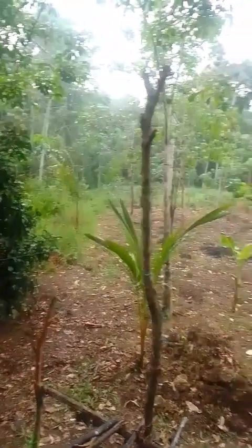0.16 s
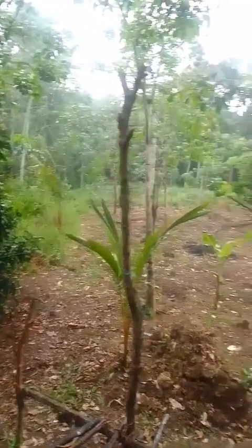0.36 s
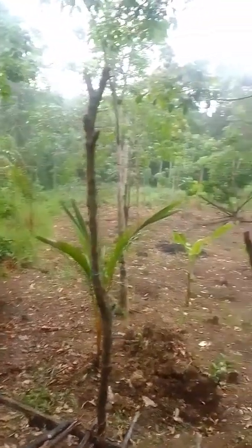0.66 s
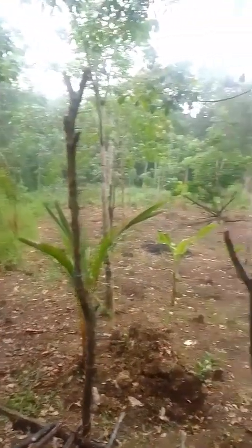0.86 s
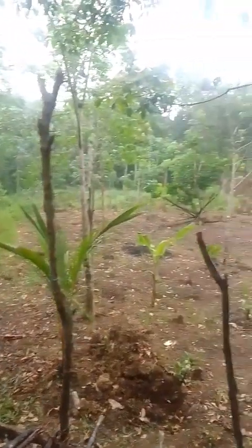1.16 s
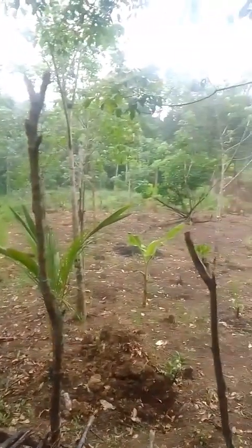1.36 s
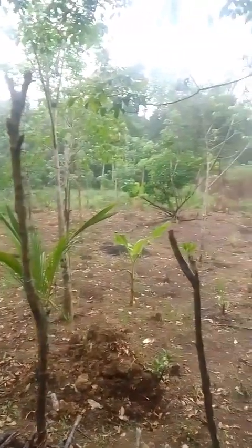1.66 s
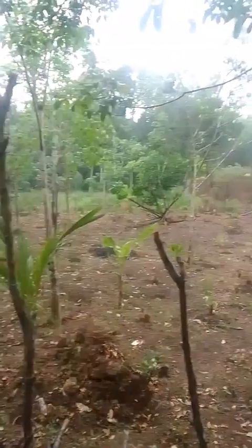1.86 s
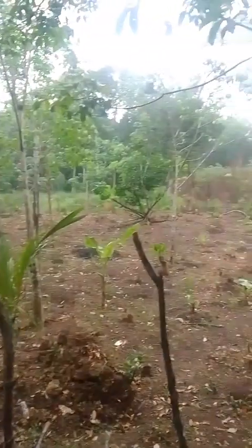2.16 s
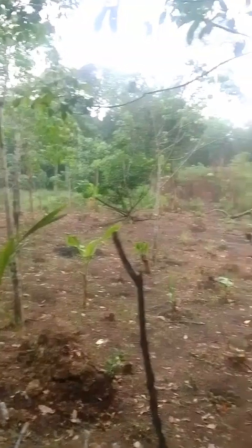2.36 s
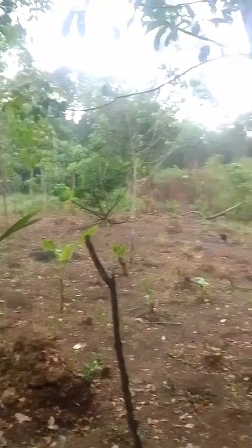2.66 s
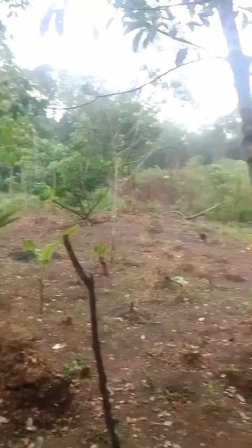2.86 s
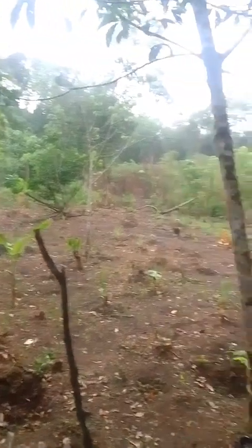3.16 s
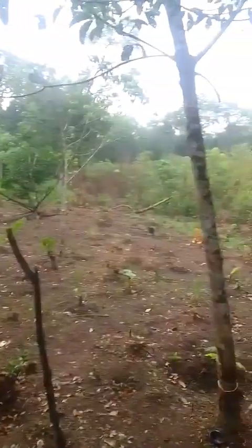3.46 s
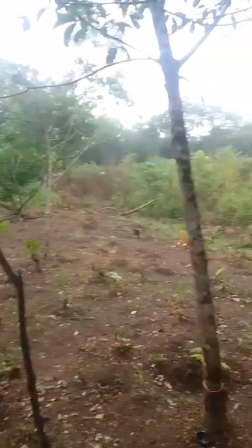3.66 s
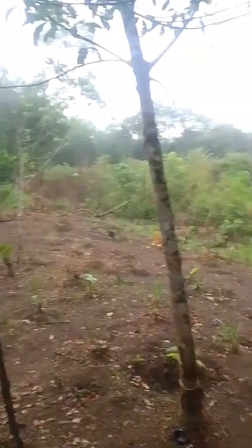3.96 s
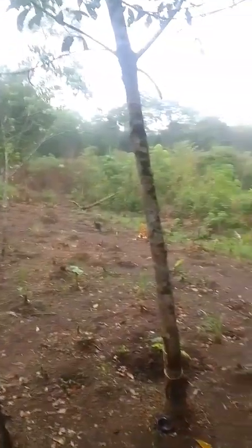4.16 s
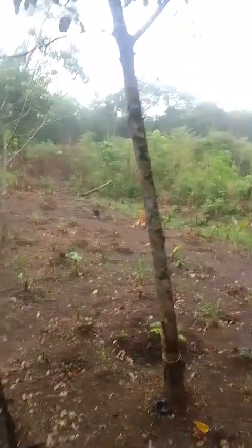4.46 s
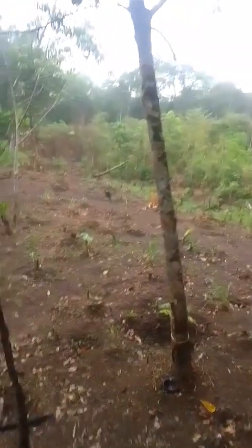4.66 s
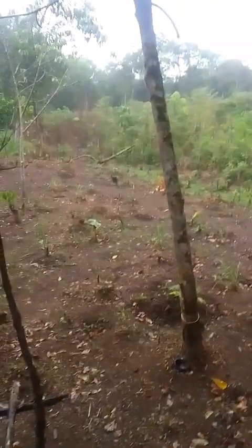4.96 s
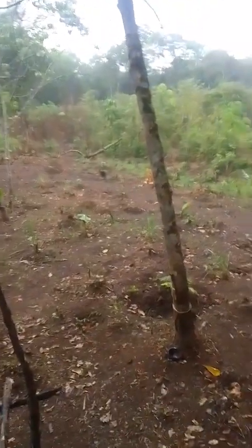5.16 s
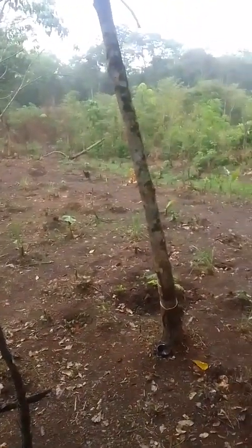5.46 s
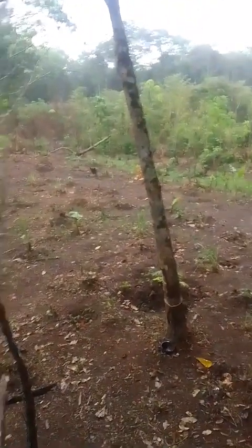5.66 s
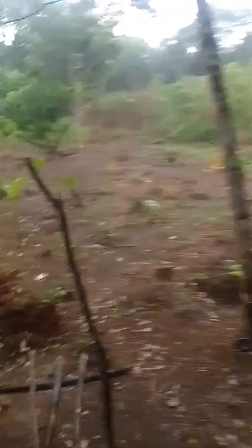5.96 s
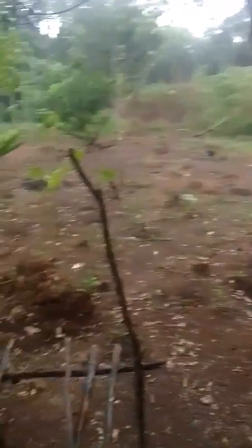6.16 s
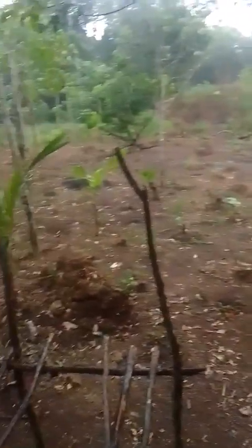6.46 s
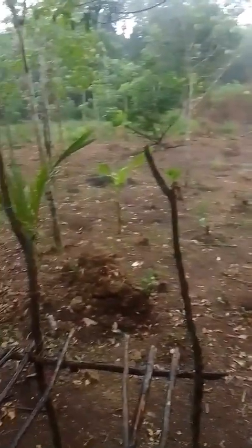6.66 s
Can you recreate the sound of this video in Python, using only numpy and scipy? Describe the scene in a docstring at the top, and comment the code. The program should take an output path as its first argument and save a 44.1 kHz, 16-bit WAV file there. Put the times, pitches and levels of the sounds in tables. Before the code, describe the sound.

Steady rain falls on an open garden plot with trees, captured in mono by a hand-held camera. A continuous, mid-heavy wash of far drops starts fairly strong, sinks by 0.4 s, and swells again around 1.2 s, with faint leaf ticks throughout. From 0.3 to 1 s, near drops are crisp and bright. At 1.04 s one lands on the camera: a loud dull bump with a short knock and fading low rumble. Scattered slaps continue, clustering at 2.5-2.8 s and 3.0-3.3 s, with occasional tiny leaf pings and hollow soil plops. The rain eases around 3.4-3.8 s, then surges near 3.9 s. Heavy, duller drops hit at 4.0, 4.4 and 4.7 s, and a dense run of slaps and plops fills 5.0-5.5 s. More strike near 5.95 s; then close hits thin out, and the wash rises to its fullest by 6.8 s.

```python
"""Steady rain on a garden plot with trees, heard from a hand-held camera. Far drops merge into a wash of shaped
noise whose level rises and falls, with light leaf ticks a few steps away. Close by, big drops slap leaves and
wet soil: short noise bursts, swinging tones and brief leaf rings. Heavy drops plop hollowly into soaked soil,
and stiff leaves ping, as tones that sink in pitch. One drop lands on the camera itself with a dull bump: a
pressure pulse, a knock and a low rumble."""
import sys
import numpy as np
from scipy import signal
from scipy.io import wavfile
from scipy.ndimage import uniform_filter1d

SR = 44100
rng = np.random.default_rng(int(sys.argv[2]) if len(sys.argv) > 2 else 0)


def to_wav(sig):
    """Store sig (one row per channel, or 1-D mono) as 16-bit WAV at the path in sys.argv[1].

    Samples outside -1..1 are clipped; the rate is SR.
    """
    pcm = np.clip(np.atleast_2d(sig), -1, 1) * 32767
    pcm = np.round(pcm).astype(np.int16)
    wavfile.write(sys.argv[1], SR, pcm.T)  # frames by channels


N = 299439


def gain_of(db):
    """Decibels to amplitude."""
    return 10 ** (np.asarray(db) / 20)


def evened(x):
    """Scales to rms 1."""
    return x / np.sqrt(np.mean(x ** 2) + 1e-20)


def at_level(sound, level_db):
    """Scales a short sound to a level taken over 10 ms."""
    return gain_of(level_db) * sound / np.sqrt(np.sum(sound ** 2) / (SR / 100))


def add(mix, start_s, sound):
    """Adds a sound into the mix at its start time, cut off at the end of the mix."""
    part = mix[max(round(start_s * SR), 0):][:len(sound)]
    part += sound[:len(part)]


def band_gain(points, hz, low_hz, high_hz):
    """One band of a colour table; neighbouring bands add up in power."""
    table_hz, table_db = np.transpose(points)
    hz = hz + 1  # keeps the logarithm finite at 0 Hz
    share = 1 / (1 + (low_hz / hz) ** 10) / (1 + (hz / high_hz) ** 10)
    return gain_of(np.interp(np.log(hz), np.log(table_hz), table_db)) * np.sqrt(share)


def sharp_front(gain):
    """Gives a gain over the full frequency circle the phase that keeps its sound from starting early."""
    log_gain = np.log(np.maximum(gain, 1e-4))
    return np.exp(np.conj(signal.hilbert(log_gain)))


def causal(points, low_hz, high_hz, size=2048):
    """Impulse response with the colour of one band and a sharp front."""
    gain = band_gain(points, abs(np.fft.fftfreq(size, 1 / SR)), low_hz, high_hz)
    return np.fft.ifft(sharp_front(gain)).real[:size // 2]


def whitened(x, size=45):
    """Evens out the broad humps in the spectrum of a short noise; energy 1."""
    spectrum = np.fft.fft(evened(x))
    power = uniform_filter1d(abs(spectrum) ** 2, size, mode="wrap") / len(x)
    flat = np.fft.ifft(spectrum / sharp_front(np.sqrt(abs(power)))).real
    return evened(flat) / np.sqrt(len(x))


def ringing(x, hz, width_hz, boost_db):
    """Lifts one damped resonance out of a sound."""
    peak = signal.iirpeak(hz, hz / width_hz, fs=SR)
    return x + gain_of(boost_db) * signal.lfilter(*peak, x)


def wander(size):
    """Smooth random drift of rms 1 that changes over size samples."""
    smooth = uniform_filter1d(rng.standard_normal(N), size)
    return evened(uniform_filter1d(smooth, size // 2))


def patter(per_s, spread_db, decay_s, ring_db, count=20):
    """Small drops at random moments, most faint and a few strong; each kind of leaf rings at its own pitch."""
    strength = gain_of(spread_db * np.minimum(rng.exponential(1, N), 4))
    hits = strength * (rng.random(N) < per_s / SR)
    kind = rng.integers(0, count, N)
    t = np.arange(SR // 50) / SR
    spatters = rng.standard_normal((count, len(t))) * np.exp(-t / decay_s)
    out = np.zeros(N)
    for k, hz in enumerate(np.geomspace(250, 7000, count)):
        spatter = ringing(evened(spatters[k]), hz, width_hz=150 + 0.042 * hz, boost_db=ring_db)
        out += signal.oaconvolve(hits * (kind == k), spatter)[:N]
    return evened(out)


# bass under the rain: time_s, level_db
BASS_LEVEL = [(0, -78), (.28, -80), (.39, -54), (.55, -67), (.7, -62.5), (1.0, -62), (1.19, -55),
              (1.5, -53), (1.7, -60.5), (2.3, -55), (2.62, -56), (2.76, -60), (2.9, -62), (3.22, -60),
              (3.4, -62), (3.58, -64), (3.72, -84), (3.83, -69), (3.97, -77), (4.05, -53.5), (4.55, -59),
              (4.72, -53), (5.1, -46.5), (5.55, -63), (5.8, -57), (5.9, -49), (6.15, -53.5), (6.5, -47),
              (6.79, -42.5)]
# low patter: time_s, level_db
LOW_PATTER_LEVEL = [(0, -51), (.2, -59.5), (.4, -54), (.55, -60), (.7, -53), (.9, -55.5), (1.15, -50),
                    (1.5, -55.5), (1.8, -59), (2.1, -60.5), (2.35, -52.5), (2.9, -55), (3.3, -54.5),
                    (3.75, -63.5), (3.95, -54), (4.2, -51.5), (4.5, -57), (4.8, -48), (5.3, -45),
                    (5.6, -51), (5.95, -47.5), (6.15, -50), (6.5, -44), (6.75, -40)]
# levels of the wash rise and fall: time_s, leaf_roar_db, soil_patter_db, spray_hiss_db
RAIN_LEVELS = [(0.0, -32.5, -45.5, -49.5), (0.18, -35.5, -43.5, -50), (0.28, -38.5, -45.5, -53),
               (0.43, -43, -50.5, -54), (0.58, -40.5, -51.5, -54.5), (0.74, -40, -47.5, -54),
               (0.84, -41.5, -52, -53.5), (1.02, -42.5, -51, -53.5), (1.14, -36, -42.5, -47),
               (1.26, -35, -46, -49), (1.38, -37, -49, -51), (1.54, -36, -46, -50),
               (1.63, -40, -51.5, -55.5), (1.87, -40.5, -51, -55), (2.2, -41.5, -49, -52),
               (2.28, -37.5, -50.5, -50.5), (2.59, -41, -49.5, -51), (2.97, -40.5, -48.5, -53.5),
               (3.18, -41, -51, -54.5), (3.46, -40.5, -47.5, -56), (3.66, -41, -53, -58.5),
               (3.8, -42, -51, -60), (3.88, -35.5, -42.5, -53), (3.98, -34.5, -44.5, -51.5),
               (4.1, -36.5, -47, -50), (4.22, -34.5, -45, -52), (4.35, -36, -43.5, -54.5),
               (4.47, -39, -50, -53), (4.64, -38.5, -48.5, -56), (4.76, -36, -45, -53),
               (4.9, -40, -49, -53), (5.0, -33.5, -41, -47), (5.12, -34, -42, -53.5),
               (5.26, -36.5, -44, -53), (5.35, -39, -48, -55.5), (5.54, -42, -50, -57.5),
               (5.63, -36.5, -52, -55.5), (5.77, -40.5, -55, -55.5), (5.9, -38, -41.5, -53),
               (5.99, -37.5, -41, -56), (6.1, -41.5, -47, -54.5), (6.3, -38, -46.5, -57),
               (6.48, -41, -49.5, -55), (6.56, -36, -44, -48.5), (6.7, -32.5, -39.5, -43.5),
               (6.79, -29, -44, -44)]


def wash_levels():
    """Levels in dB over time of the bass, the low patter, the soil patter, the leaf roar and the spray hiss."""
    t = np.arange(N) / SR
    time_s, roar_db, soil_db, hiss_db = np.transpose(RAIN_LEVELS)
    lows = [np.interp(t, *np.transpose(curve)) for curve in (BASS_LEVEL, LOW_PATTER_LEVEL)]
    return lows + [np.interp(t, time_s, level_db) for level_db in (soil_db, roar_db, hiss_db)]


# colour of the far wash; each band is levelled apart: frequency_hz, density_db (relative dB per Hz)
WASH_COLOUR = [(30, -16), (80, -10), (170, -4), (330, -3.5), (620, -5), (900, -4), (1070, -4), (1190, 0),
               (1290, 3), (1390, 1.5), (1560, -2), (1700, -3.5), (2000, -6), (3400, -15), (4600, -25.5),
               (6800, -31.5), (8900, -29), (10000, -39.5), (12000, -42), (15300, -51.5)]
# borders of the five bands, from bass to spray hiss: edge_hz
WASH_BAND_EDGES = [10, 160, 330, 1000, 4100, 20000]


def wash():
    """Countless far drops merge into noise; nearer ones stand out as grain in every band at once."""
    grain_db = [-6, -10.5, -8, -9.5, -10.5]  # grain against the noise, band by band
    patch_db = [1.6, 1.2, 0.7, 0.21, 0.42]  # rms drift of each band's own level
    grain = patter(per_s=1000, spread_db=3.0, decay_s=0.00058, ring_db=13.0)
    flutter_db = 0.77 * wander(size=1300)  # shared by all bands
    out = np.zeros(N)
    for k, level_db in enumerate(wash_levels()):
        drive = rng.standard_normal(N) + gain_of(grain_db[k]) * grain
        colour = causal(WASH_COLOUR, *WASH_BAND_EDGES[k:k + 2])
        band = evened(signal.oaconvolve(drive, colour)[:N])
        out += band * gain_of(level_db + flutter_db + patch_db[k] * wander(size=1800))
    return out


# colour of a drop's splash, for the ticks and the near drops: frequency_hz, density_db (relative dB per Hz)
SPLASH_COLOUR = [(30, -15), (120, -2.5), (300, 2), (480, 3), (660, -0.5), (900, 0), (1350, -1.5),
                 (2300, -6), (3700, -7), (4600, -11.5), (8800, -16), (10200, -26.5), (12000, -26.5),
                 (15000, -34.5)]


def ticks(level_db):
    """Light ticks on fallen leaves a few steps away: sparse patter in the splash colour."""
    crackle = patter(per_s=70, spread_db=3.5, decay_s=0.0004, ring_db=12)
    colour = causal(SPLASH_COLOUR, low_hz=1500, high_hz=9500)
    return gain_of(level_db) * evened(signal.oaconvolve(crackle, colour)[:N])


def boom(start_s, level_db, hz, width_hz, swell_s):
    """A low rumble, narrow-band noise, swells after the bump and fades."""
    age = np.maximum(np.arange(N) / SR - start_s, 0) / swell_s
    peak = signal.iirpeak(hz, hz / width_hz, fs=SR)
    once = signal.lfilter(*peak, rng.standard_normal(N))
    rumble = evened(signal.lfilter(*peak, once))
    return gain_of(level_db) * rumble * (age * np.exp(1 - age)) ** 2


def bump(hit_s, level_db, push_s, swing_s, knock_hz, knock_db, knock_s, lead_s, settle_s, settle_share):
    """A drop on the camera body: a swing, a brief opposite pressure push, a case knock and a slow settling."""
    t = np.arange(-SR // 40, SR // 2) / SR
    push = np.exp(-np.hypot(t, push_s / 2) / push_s)
    swing = np.exp(-((t + lead_s) / swing_s) ** 2)
    settle = (t > 0) * np.exp(-abs(t) / settle_s)
    # swing and settling together balance the push, so the pressure sums to zero
    balance = (1 - settle_share) * swing / swing.sum() + settle_share * settle / settle.sum()
    pulse = push.sum() * balance - push
    since_knock = t + lead_s
    knock = (since_knock > 0) * np.sin(2 * np.pi * knock_hz * since_knock) * np.exp(-abs(since_knock) / knock_s)
    out = np.zeros(N)
    add(out, hit_s + t[0], gain_of(level_db) * pulse / abs(pulse).max() + gain_of(knock_db) * knock)
    return out


def plop(hz, level_db, decay_s, sag_per_s, rise_s):
    """A struck leaf or puddle swings for a few cycles and sinks in pitch."""
    t = np.arange(SR // 16) / SR
    turns = np.cumsum(hz * np.exp(-sag_per_s * t)) / SR
    shape = (1 - np.exp(-t / rise_s)) * np.exp(-t / decay_s)
    return at_level(np.sin(2 * np.pi * turns) * shape, level_db)


# hollow plops where heavy drops break into soaked soil:
# start_s, level_db (over 10 ms), pitch_hz (at the start), sag_per_s (pitch fall), decay_s
SOIL_PLOPS = [(1.976, -40, 201, 5, 0.0028), (2.7735, -36.5, 168, 6, .005), (3.025, -36.5, 330, 8, 0.0033),
              (3.2555, -27.5, 340, 13, 0.0033), (3.2562, -45, 667, 10, 0.0018),
              (4.0152, -25.5, 740, 4.4, 0.0063), (4.0155, -24, 338, 12, 0.0025),
              (4.035, -33, 290, 12, 0.0057), (4.382, -38, 195, 5, 0.0069), (4.3855, -29.5, 813, 51, 0.003),
              (4.7159, -27, 205, 5, 0.0045), (4.7258, -29, 488, 8, 0.0099), (4.728, -34, 324, 7.2, .006),
              (5.0508, -29, 184, 8.8, 0.0086), (5.0525, -28, 620, 16, .003),
              (5.0627, -25.5, 302, 16, 0.0018), (5.1607, -30, 523, 10, 0.0015),
              (5.235, -37, 240, 10, 0.0025), (5.268, -34, 330, 15, 0.0029), (5.387, -36.5, 417, 20, 0.0057)]
# stiff leaves ping under some of the hardest drops: start_s, level_db (over 10 ms), pitch_hz (at the start), decay_s
LEAF_PINGS = [(0.8971, -32, 4030, 0.0016), (0.9567, -46, 8700, .0015), (1.2342, -39.5, 4020, .0015),
              (1.976, -28, 3820, 0.0014), (2.1456, -42, 4300, 0.0017), (3.2562, -31, 3520, .002),
              (5.4614, -32, 3470, .001)]


def plops():
    """The hollows that heavy drops punch into the mud sound with a falling note; stiff leaves ping."""
    out = np.zeros(N)
    for start_s, level_db, hz, sag_per_s, decay_s in SOIL_PLOPS:
        add(out, start_s, plop(hz, level_db, decay_s, sag_per_s, rise_s=0.0021))
    for start_s, level_db, hz, decay_s in LEAF_PINGS:
        add(out, start_s, plop(hz, level_db, decay_s, sag_per_s=5, rise_s=0.00025))
    return out


def burst(noise, colour, level_db, decay_s, rise_s, scatter_db, scatter_s, click_db=-np.inf):
    """Water bursts on a surface: perhaps a click, a fast-dying gush, then a faint scatter of droplets."""
    t = np.arange(len(noise)) / SR
    fading = np.exp(-t / decay_s) + gain_of(scatter_db) * np.exp(-t / scatter_s)
    gush = whitened(noise * (1 - np.exp(-t / rise_s)) * fading)
    click = gain_of(click_db) * (t == 0)
    return at_level(signal.fftconvolve(gush + click, colour), level_db)


# lesser near drops: mean and spread of the level (against the leaf roar) and of the brightness
LESSER_PER_S = 14
LESSER_DB, LESSER_BRIGHT_DB = (-8, -0.5), (0.5, -2)
LESSER_DECAY_S, LESSER_THUD_HZ = 0.0023, 795
LESSER_LEAF_HZ = (1260, 4200)  # lowest and highest leaf ring


def lesser_drops(count=120):
    """Rows like those of the near drops, for weaker ones at random moments and leaves; their level follows the
    leaf roar."""
    gap, leaf = rng.random((count, 2)).T
    size, bright = rng.standard_normal((count, 2)).T
    start_s = np.cumsum(-np.log(1 - gap)) / LESSER_PER_S
    roar_db = np.interp(start_s, *np.transpose(RAIN_LEVELS)[:2])
    low_hz, high_hz = LESSER_LEAF_HZ
    rows = np.transpose([start_s,
                         roar_db + LESSER_DB[0] + LESSER_DB[1] * size,
                         LESSER_BRIGHT_DB[0] + LESSER_BRIGHT_DB[1] * bright,
                         np.full(count, LESSER_DECAY_S),
                         low_hz * (high_hz / low_hz) ** leaf,
                         np.full(count, LESSER_THUD_HZ)])
    return list(rows[start_s < N / SR])


# thud and spray against the slap, at brightness 0
THUD_DB, SPRAY_DB = -5.5, -10
# swing of the struck leaf and after-rumble against the thud
SWING_DB, RUMBLE_DB = -7.5, -17
# the thud outlasts the slap, the more so the duller the drop
THUD_LINGER_S, THUD_LINGER_PER_DB = 0.00053, 0.1
# borders of the thud, slap and spray bands: edge_hz
DROP_BAND_EDGES = [10, 900, 3000, 20000]
# near drops: start_s, level_db (slap, over 10 ms), brightness_db (above 0 more spray, below 0 more thud),
# decay_s (base that each part scales), leaf_ring_hz, thud_pitch_hz
NEAR_DROPS = [(0.0639, -35.5, 3, 0.00092, 3720, 800), (0.1805, -41.5, 20, 0.0031, 3680, 480),
              (0.3043, -35, 7.5, 0.0023, 1400, 700), (0.331, -39, 12.5, 0.0057, 4130, 840),
              (0.3407, -35, 5.5, 0.0017, 1360, 840), (0.3517, -37, 4, 0.0018, 8400, 700),
              (0.3605, -48, 9, .001, 8400, 700), (0.385, -48, 12, 0.0019, 6100, 800),
              (0.4233, -32.5, 9, 0.0013, 4960, 815), (0.4401, -35, 6, 0.0024, 2720, 360),
              (0.4571, -38, 3, .001, 3700, 600), (0.4683, -38.5, 1, 0.0011, 3500, 700),
              (0.512, -37, 10.5, 0.0018, 1900, 840), (0.5255, -51, 11, .001, 7000, 800),
              (0.6165, -41, 2, 0.001, 2500, 800), (0.645, -42, 1, 0.00065, 2700, 800),
              (0.6609, -31, 7, 0.0006, 2530, 860), (0.668, -43, 2, .002, 3000, 800),
              (0.711, -44, 6, .001, 7000, 800), (0.7224, -39, 7, 0.00048, 2820, 800),
              (0.74, -45, 8, .001, 2700, 800), (0.7768, -46.5, 13, 0.0025, 8200, 800),
              (0.782, -45.5, 13, 0.0057, 4360, 840), (0.8972, -33, 11, 0.0036, 4100, 446),
              (0.9359, -41, -5, 0.0011, 2300, 800), (0.9519, -32.5, 5.5, 0.0015, 3040, 840),
              (0.9568, -34, 7, 0.0044, 8700, 676), (0.9661, -34, -4, 0.003, 1330, 584),
              (1.0072, -39.5, 12, 0.0047, 9400, 680), (1.0274, -49, 12, .001, 2700, 800),
              (1.0341, -39, 5, .001, 3400, 500), (1.0428, -35.5, 12, 0.00092, 1340, 170),
              (1.0777, -49, 11, .001, 3600, 800), (1.0828, -34, 8.5, 0.0019, 3840, 840),
              (1.142, -44, -13, 0.0054, 1300, 337), (1.1617, -33, 4, 0.0048, 1370, 610),
              (1.2076, -43, 12, 0.0033, 3000, 800), (1.2337, -33, 2, 0.0016, 1430, 850),
              (1.2812, -34, 8, 0.004, 4110, 850), (1.4268, -34, 1, 0.005, 1350, 510),
              (1.5026, -58, 3, .001, 2300, 800), (1.5141, -29.5, 0, 0.0021, 2230, 437),
              (1.5207, -36, -1, 0.00083, 2800, 700), (1.6505, -31.5, 7, 0.0011, 4800, 740),
              (1.907, -51, 11, .001, 4200, 800), (1.938, -42, 4, 0.0011, 2620, 805),
              (1.9724, -40, 4, 0.00098, 3400, 595), (1.9758, -31, 9.5, 0.0026, 2100, 480),
              (1.9867, -36.5, 0, .002, 2400, 700), (2.0609, -38, 2, 0.0039, 1400, 820),
              (2.0965, -32.5, 3.5, 0.00054, 1840, 800), (2.1456, -40, 9, 0.0029, 4300, 410),
              (2.1875, -47.5, 12, .002, 3600, 650), (2.3264, -42, 16, 0.0039, 2500, 780),
              (2.3343, -42, 12, 0.0017, 4350, 400), (2.3588, -32, 4, 0.0096, 1350, 730),
              (2.449, -40, 1, 0.0025, 1640, 800), (2.5025, -40, 1, 0.001, 2310, 800),
              (2.53, -27.5, 2, 0.0016, 1680, 297), (2.5445, -48, 17, .001, 8000, 800),
              (2.6173, -40, 1.5, 0.0024, 4150, 500), (2.6614, -52, 14, .001, 4030, 700),
              (2.718, -27.5, 3, 0.0065, 2490, 380), (2.7327, -37, 9.5, 0.00058, 6600, 400),
              (2.7523, -32, -8.5, 0.0083, 3380, 610), (2.7753, -28.5, 2, 0.0041, 1200, 600),
              (2.7831, -46, 16, .0015, 4070, 600), (2.8215, -29.5, 0, 0.0021, 1730, 494),
              (2.9642, -34, 4, 0.0041, 1790, 310), (3.0577, -31, -3, 0.0036, 2580, 730),
              (3.0759, -29.5, 1.5, 0.0027, 1280, 830), (3.184, -36.5, -7.5, .001, 1400, 810),
              (3.1903, -27.5, 3, 0.0014, 1000, 724), (3.2025, -29, -3.5, 0.0047, 1350, 730),
              (3.215, -40, -4, .005, 1300, 398), (3.2545, -35.5, -0.5, .002, 5500, 600),
              (3.2563, -25, 0, 0.0015, 1590, 350), (3.3534, -43, -3, 0.00091, 3300, 600),
              (3.4362, -38.5, 13.5, 0.0027, 3000, 760), (4.0152, -26.5, 7, 0.0058, 6500, 715),
              (4.0195, -25, -4.5, 0.007, 1500, 575), (4.028, -41, -10.5, 0.0045, 1290, 560),
              (4.216, -40, -6, .002, 1350, 800), (4.229, -44, 9.5, 0.00078, 8600, 800),
              (4.383, -25.5, -1.5, 0.0055, 1050, 613), (4.3915, -41, -13.5, 0.0025, 1400, 485),
              (4.5415, -46, -12, 0.0044, 1300, 386), (4.5625, -37.5, -4, 0.0021, 1970, 348),
              (4.6185, -43, -10, 0.0023, 1300, 323), (4.6907, -32.5, -1, 0.0038, 2350, 800),
              (4.7185, -28.5, -6.5, 0.0098, 1360, 696), (4.7285, -41, -8, 0.0055, 1300, 620),
              (4.805, -32, -4.5, 0.01, 1500, 314), (4.8272, -32.5, 1, 0.0078, 1220, 376),
              (4.849, -35.5, -4, 0.0049, 1310, 405), (4.9025, -50, -17, 0.0036, 1300, 280),
              (4.9635, -28.5, -5.5, 0.007, 1270, 340), (5.0527, -24, -1.5, 0.017, 1220, 460),
              (5.062, -28, 5.5, 0.0068, 1070, 477), (5.0723, -28, -2, 0.0078, 1830, 182),
              (5.128, -35.5, -5, .003, 2100, 705), (5.1517, -33.5, -2, 0.0009, 2920, 550),
              (5.1612, -32, -10, 0.0013, 1330, 584), (5.193, -35, -5, .005, 1800, 800),
              (5.217, -28.5, -3, 0.0041, 3100, 820), (5.2215, -27, 0, 0.0045, 1260, 640),
              (5.236, -33.5, -2, 0.0037, 1320, 241), (5.2396, -32, 4, 0.0011, 3340, 400),
              (5.249, -31.5, -5, 0.0028, 1360, 240), (5.2674, -28.5, 3, 0.0047, 1300, 535),
              (5.279, -48, 6, .0008, 8500, 800), (5.306, -37, 3, 0.0011, 2300, 810),
              (5.3212, -35, -1, 0.0028, 1570, 825), (5.3786, -33, 9.5, 0.0028, 3700, 600),
              (5.3827, -32, 2.5, 0.006, 2100, 660), (5.3897, -32.5, -3, 0.0052, 1500, 650),
              (5.461, -26.5, -1.5, 0.0013, 1270, 610), (5.5803, -31.5, -2.5, 0.0015, 3300, 503),
              (5.6222, -37, -6, 0.01, 1300, 228), (5.6426, -37.5, 0, 0.00092, 3340, 800),
              (5.7612, -34.5, -3, 0.0012, 2820, 734), (5.863, -31, -0.5, 0.0028, 3030, 170),
              (5.9309, -39, 3, .002, 7500, 600), (5.9421, -43, 11, .002, 2800, 800),
              (5.9482, -29.5, 3, 0.0053, 3600, 560), (5.9589, -24, 0.5, 0.0016, 1140, 655),
              (5.9744, -39, 4, .002, 2300, 800), (5.9998, -32, -4.5, 0.0059, 2920, 720),
              (6.012, -33, -2, 0.0023, 3480, 650), (6.0463, -41.5, -5, .001, 2000, 720),
              (6.1182, -37.5, 3, 0.0045, 1170, 840), (6.1864, -40, 2, 0.0015, 3100, 600),
              (6.197, -47, -10, .006, 1300, 215), (6.2046, -41, 4, 0.00076, 3100, 800),
              (6.558, -44, 9, .001, 7560, 600), (6.593, -35.5, 4, 0.00081, 1370, 795),
              (6.7486, -27.5, -3, 0.00056, 1350, 800)]


def drops():
    """Near drops push leaf or soil (thud, swing, low rumble), slap flat and throw spray; the leaf rings briefly."""
    thud, slap, spray = (causal(SPLASH_COLOUR, *DROP_BAND_EDGES[k:k + 2]) for k in range(3))
    rumble = causal(SPLASH_COLOUR, low_hz=97, high_hz=240)
    out = np.zeros(N)
    for start_s, slap_db, bright_db, decay_s, leaf_hz, thud_hz in list(NEAR_DROPS) + lesser_drops():
        thud_db = slap_db + THUD_DB - bright_db
        spray_db = slap_db + SPRAY_DB + bright_db
        thud_s = decay_s + THUD_LINGER_S * np.exp(-THUD_LINGER_PER_DB * bright_db)
        thud_noise, slap_noise, spray_noise = rng.standard_normal((3, SR // 16))
        rumble_noise = rng.standard_normal(SR // 6)
        push = ringing(thud, thud_hz, width_hz=140, boost_db=0)
        smack, fizz = (ringing(band, leaf_hz, width_hz=0.11 * leaf_hz, boost_db=5.5) for band in (slap, spray))
        add(out, start_s, burst(thud_noise, push, thud_db, 1.2 * thud_s,
                                rise_s=0.00021, scatter_db=-23, scatter_s=0.014))
        add(out, start_s, plop(thud_hz, thud_db + SWING_DB, 0.91 * thud_s, sag_per_s=8.6, rise_s=0.00034))
        add(out, start_s, burst(rumble_noise, rumble, thud_db + RUMBLE_DB, decay_s=0.04,
                                rise_s=0.0024, scatter_db=-18.0, scatter_s=0.079))
        add(out, start_s, burst(slap_noise, smack, slap_db, 0.76 * decay_s,
                                rise_s=0.0001, scatter_db=-17, scatter_s=0.0061))
        # the spray starts with a hard click, levelled against its gush
        add(out, start_s, burst(spray_noise, fizz, spray_db, 0.45 * decay_s,
                                rise_s=0.00029, scatter_db=-12.5, scatter_s=0.002, click_db=-11))
    return out


def scene():
    """Wash, light ticks, near drops, plops and the bump with its rumble, in one channel."""
    on_camera = bump(hit_s=1.0440, level_db=-7.5, push_s=0.0014, swing_s=0.0027,
                     knock_hz=1040, knock_db=-11, knock_s=0.0014,
                     lead_s=0.00072, settle_s=0.17, settle_share=0.38)
    after_bump = boom(start_s=1.09, level_db=-47.5, hz=127, width_hz=31, swell_s=0.14)
    background = wash() + ticks(level_db=-56)
    return (background + drops() + plops() + on_camera + after_bump)[None]


def record(dry):
    """The recorder's band limit: a steep low-pass at 15.7 kHz."""
    low_pass = signal.firwin(511, 15700, window=("kaiser", 9), fs=SR)
    return signal.oaconvolve(dry, low_pass[None], "same")


dry = scene()
out = record(dry)
to_wav(out)
```